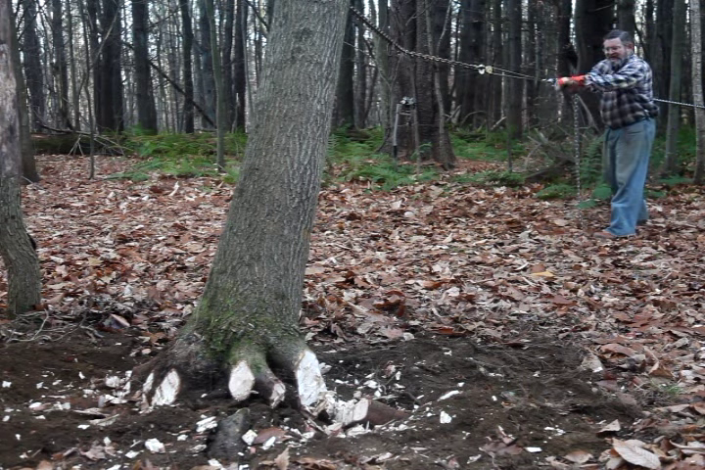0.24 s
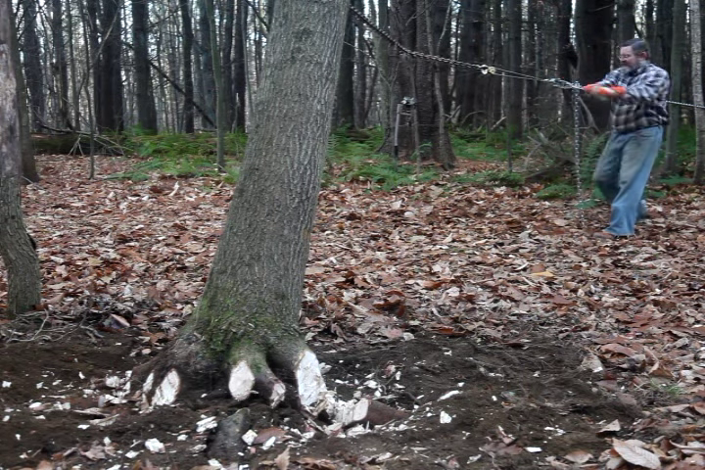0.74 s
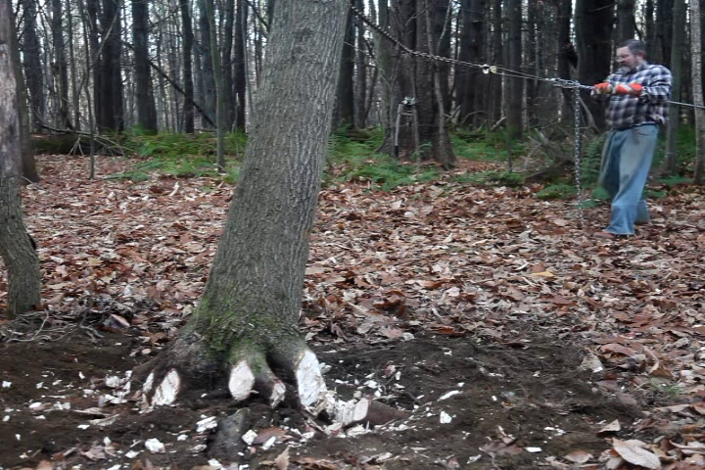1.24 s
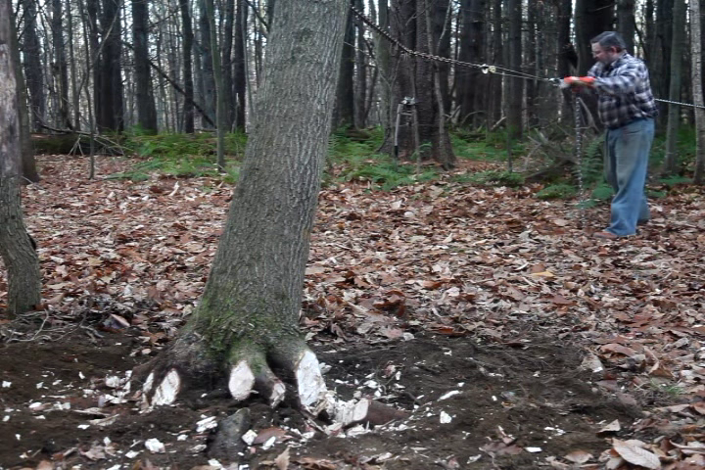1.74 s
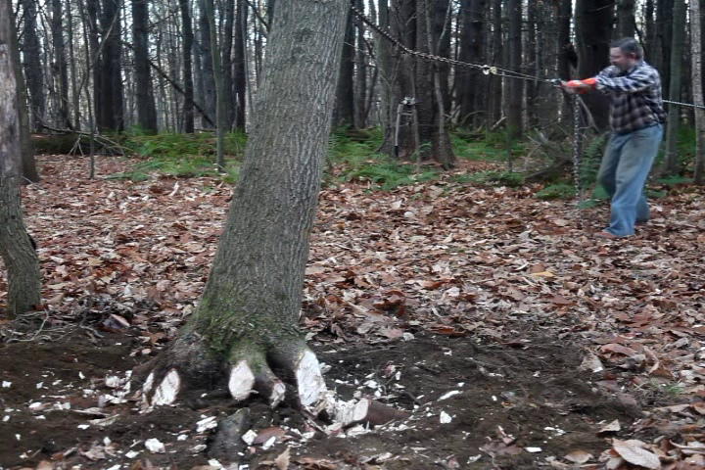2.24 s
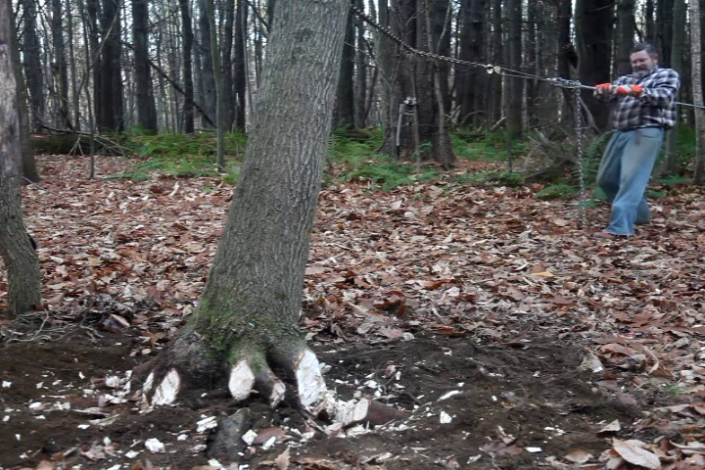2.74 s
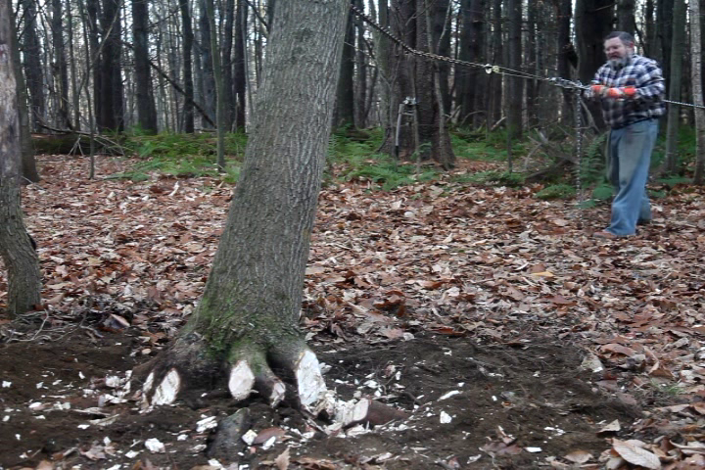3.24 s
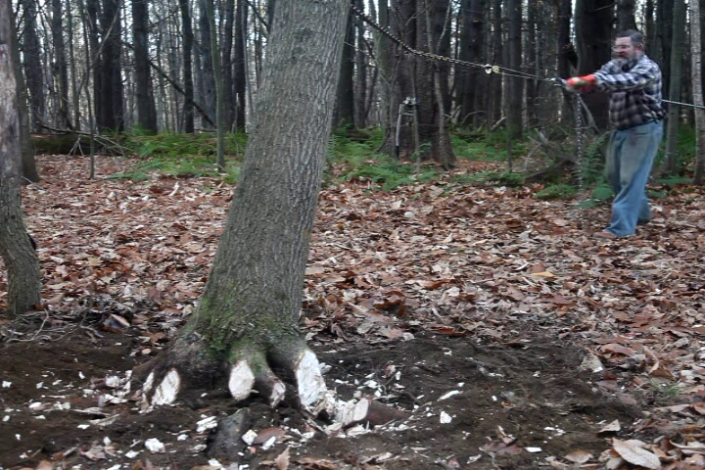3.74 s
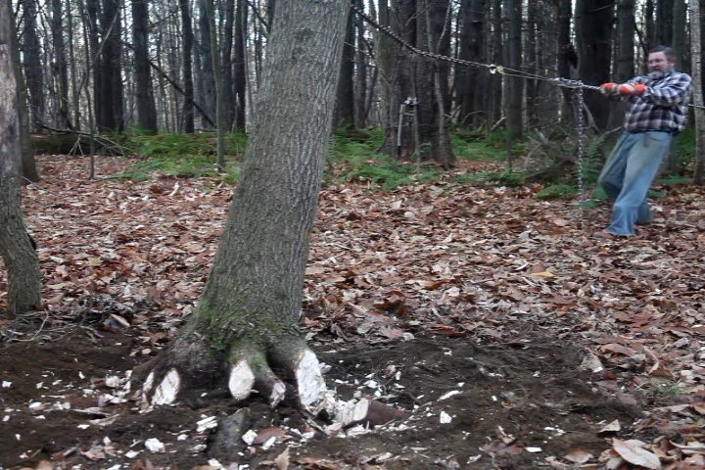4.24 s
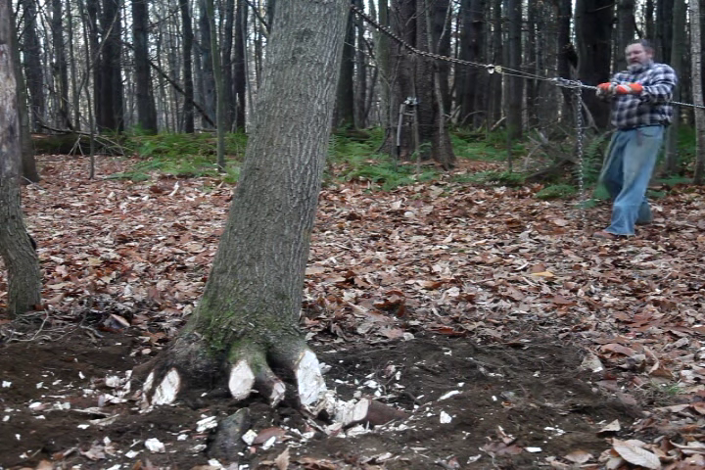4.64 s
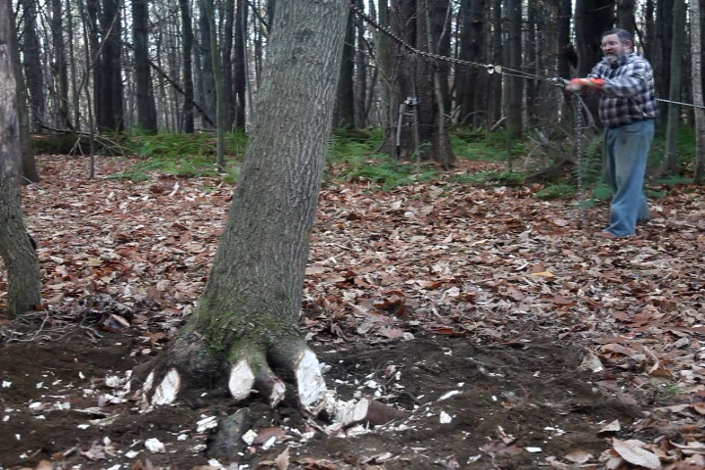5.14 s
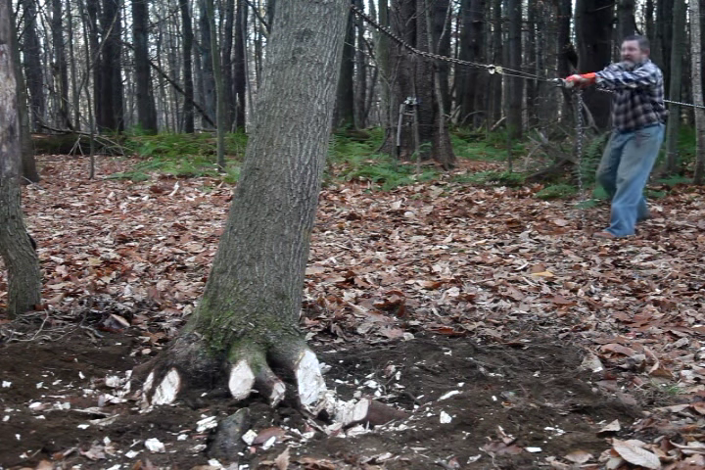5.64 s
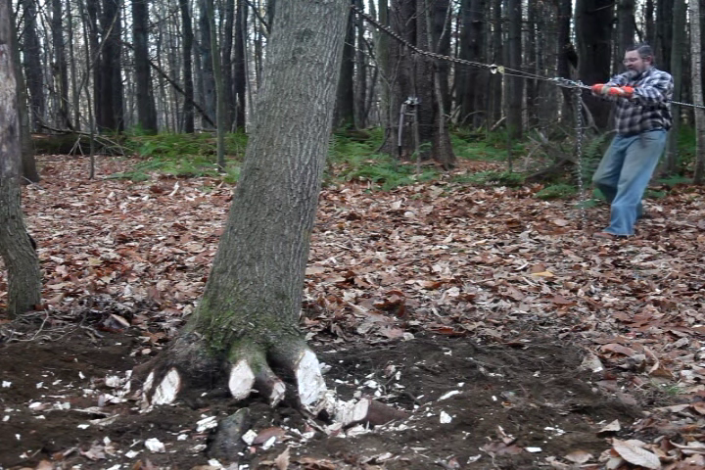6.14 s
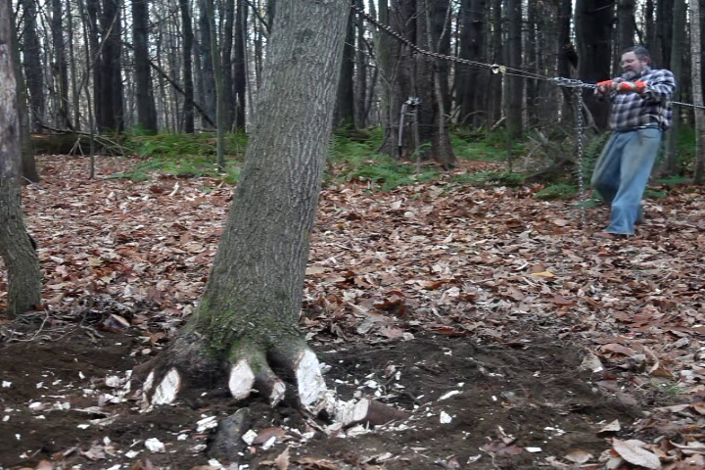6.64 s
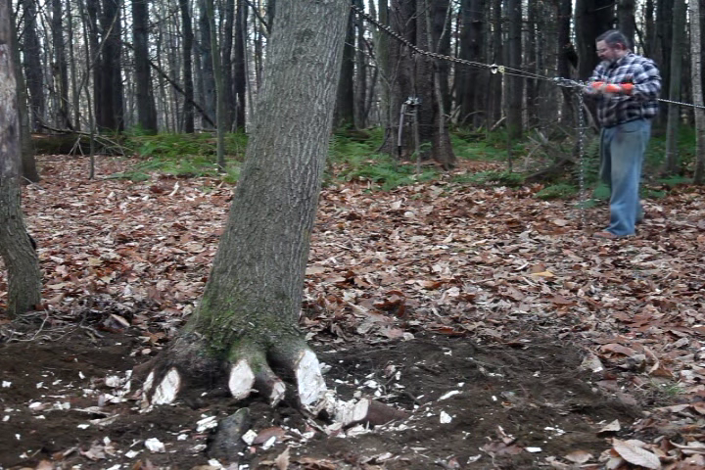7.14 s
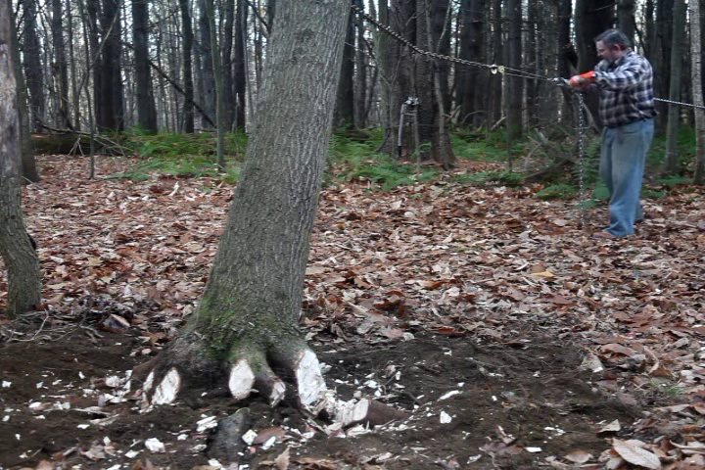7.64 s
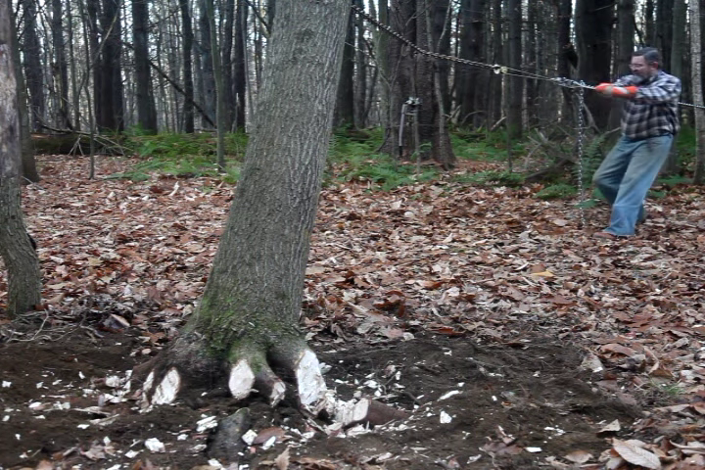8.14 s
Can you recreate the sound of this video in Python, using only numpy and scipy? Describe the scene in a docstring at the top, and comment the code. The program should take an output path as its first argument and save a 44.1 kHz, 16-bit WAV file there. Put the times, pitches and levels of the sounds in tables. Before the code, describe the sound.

In an open leafy wood, a hand-levered winch gives bright, hard ratchet clacks in small groups, with softer return clicks and faint chain jingles between. Around six seconds the chain slips in a rapid grinding clatter, knocking dully in the nearby trunk, alongside the loudest clacks. Leaves rustle and crunch underfoot, then clicks resume. The microphone sits near the trunk, winch some metres away, with soft woodland echo and distant traffic and wind.

```python
"""Sharp ratchet clacks, grinding chain slips and dry leaves rustling underfoot, in a leafy wood.
A hand winch tightens a chain to a tree: two pawls drop in turn over the ratchet teeth, as noise cracks and ringing metal.
The chain slips link by link and jingles; each jolt knocks in the nearby trunk just before it arrives through the air.
Snaps are short pitched noise, rustle is dense crackle, close taps are filtered clicks, and the wood adds a noise tail.
Behind it all lie far traffic and wind, as shaped noise, and a faint engine drone of wandering tones."""
import sys
import numpy as np
from scipy import signal
from scipy.fft import rfft, irfft, next_fast_len
from scipy.io import wavfile
from scipy.ndimage import uniform_filter1d

SR = 44100
rng = np.random.default_rng(int(sys.argv[2]) if len(sys.argv) > 2 else 0)


def transcribe(u):
    """Save the signal u as a 16-bit wav file named by the first command-line argument.

    u: samples, shape (n,) or (channels, n), limited to [-1, 1]; the rate is SR.
    q: integer samples, one column per channel.
    """
    v = np.clip(np.atleast_2d(u).T, -1, 1)
    q = np.round(v * 32767).astype(np.int16)
    wavfile.write(sys.argv[1], SR, q)


def magnitude_from_level(level_db):
    """Linear magnitude for a level in decibels (20 dB per decade)."""
    exponent = np.asarray(level_db, float) / 20
    return 10 ** exponent


N = 370440  # length in samples

# The holding pawl drops while the lever is pulled. Each row: start in seconds, level in dB.
HOLD_PAWL_DROPS = [(0.769, -6.5), (0.8894, -4.5), (0.9941, -4), (2.47, -7), (2.5813, -9), (2.7045, -6.5),
                   (4.1699, -5), (4.289, -2.5), (6.0061, 0), (6.2327, 2), (6.454, -0.5), (8.2529, -1.5),
                   (8.3583, -2.5)]
# The lever's own pawl drops while the lever swings back. Each row: start in seconds, level in dB.
LEVER_PAWL_DROPS = [(0.031, -15), (0.2505, -16), (1.629, -14.5), (1.748, -10.5), (1.8981, -19.5),
                    (3.4027, -15.5), (3.5215, -12.5), (3.9502, -30), (5.091, -12), (5.1997, -7),
                    (5.362, -7), (7.2576, -9.5), (7.3784, -9)]
# Chain links slip under load. Each row: start in seconds, level in dB.
CHAIN_SLIPS = [(5.9283, -18.5), (5.9559, -11), (5.998, -7), (6.0586, -8.5), (6.1101, -4), (6.1596, -2.5),
               (6.198, -1.5), (6.235, -16.5), (6.2698, -1), (6.3067, 1), (6.355, -3), (6.3841, -2),
               (6.4186, 1), (6.458, -0.5), (6.5, -8), (6.5485, -3), (8.223, -18)]
# Slack links touch. Each row: start in seconds, level in dB.
LINK_TOUCHES = [(0.002, -27.5), (0.081, -24), (0.628, -45), (0.7, -38), (1.463, -33), (1.52, -25.5),
                (1.547, -31), (1.586, -27), (1.666, -22), (1.74, -24), (1.812, -24), (3.196, -30),
                (3.26, -36), (4.011, -30.5), (4.044, -24), (4.084, -39), (4.109, -25.5)]
# Tugs set the loose handle chattering. Each row: start in seconds, level in dB.
HANDLE_TUGS = [(5.54, -27), (5.572, -27), (5.749, -21), (7.499, -26), (7.964, -24), (7.982, -24),
               (8.083, -28.5), (8.104, -32)]
# The trunk takes up load with a dull crunch. Each row: start in seconds, level in dB.
TRUNK_HEAVES = [(0.759, -35), (2.333, -33), (2.438, -29.5), (4.145, -23.5), (8.2124, -15.5)]
# Feet shift in the leaves. Each row: start in seconds, start of the fade in seconds, level in dB.
FOOT_RUSTLES = [(0.438, 0.775, -58), (1.344, 1.943, -44), (2.15, 2.48, -52), (3.114, 3.434, -46),
                (3.608, 4.205, -46), (4.545, 4.95, -45.5), (6.585, 6.806, -31.5), (6.891, 7.166, -35),
                (7.423, 7.559, -32.5), (7.96, 8.22, -46.5)]
# Twigs and leaves snap underfoot. Each row: start in seconds, level in dB, pitch in Hz.
TWIG_SNAPS = [(1.3789, -15.5, 5600), (1.394, -18, 6600), (2.064, -22, 6400), (4.575, -9, 7150),
              (5.753, -19.5, 6360), (6.832, -18.5, 7800), (6.978, -0.5, 5600), (7.075, -6, 7100),
              (7.941, -22.5, 6200), (8.003, -16.5, 6500), (8.105, -20.5, 6400), (8.1462, -15.5, 6500),
              (8.164, -21.5, 5660)]
# Short knocks close to the microphone. Each row: start in seconds, level in dB, pitch in Hz, brightness in Hz.
CLOSE_TAPS = [(0.941, -10, 358, 1920), (1.129, -29.5, 182, 497), (1.145, -27, 124, 293),
              (2.528, -15.5, 365, 1950), (2.798, -29.5, 335, 1000), (4.248, -13, 336, 1520),
              (7.2177, 1.5, 1130, 6200), (8.369, -11.5, 180, 1190)]

# Ringing of the winch frame. Each row: frequency in Hz, level in dB, time to fall 60 dB in seconds.
FRAME_MODES = [(2240, -25, .16), (3960, -28, .15), (4510, -25, .2), (5000, -22, .06), (6870, -18, .14),
               (7230, -9, .03), (8810, -17, .05), (9600, -20, .03)]
# Ringing of the lever. Each row: frequency in Hz, level in dB, time to fall 60 dB in seconds.
LEVER_MODES = [(2250, -26, .12), (2600, -24, .06), (3280, -20, .04), (5390, -25, .1), (6810, -20, .07),
               (7210, -19, .13), (7450, -9, .02), (8050, -21, .05)]
# Ringing of a loaded link. Each row: frequency in Hz, level in dB, time to fall 60 dB in seconds.
LINK_MODES = [(2710, -13, .025), (4000, -9, .025), (4280, -10, .025), (6310, -4, .03), (7480, -8, .025),
              (8250, -8, .035)]
# Ringing of a slack link. Each row: frequency in Hz, level in dB, time to fall 60 dB in seconds.
LOOSE_LINK_MODES = [(4820, -13, .05), (5090, -3, .05), (5740, -10, .08), (7670, -11, .13), (8180, -14, .02)]
# Ringing of the handle. Each row: frequency in Hz, level in dB, time to fall 60 dB in seconds.
HANDLE_MODES = [(2050, -5, .025), (2550, -3, .028), (3450, -5, .015), (4380, -6, .015)]
# Ringing of the trunk. Each row: frequency in Hz, level in dB, time to fall 60 dB in seconds.
TRUNK_MODES = [(199, -27, .12), (365, -22, .07), (402, -18, .08), (438, -22, .07), (662, -31, .1),
               (1370, -17, .04), (1475, -16, .04), (1900, -12, .04), (2100, -19, .07), (2440, -19, .06),
               (2710, -18, .03)]

# Colour of metal cracks. Each row: frequency in Hz, relative level in dB.
CRACK_SPECTRUM = [(400, -19), (1400, -11), (2400, -3), (3500, -5), (5100, 4), (6000, 3.5), (7300, 9.5),
                  (9000, -0.5), (10500, -10.5), (16000, -20.5)]
# Colour of leaf crackle. Each row: frequency in Hz, relative level in dB.
LEAF_SPECTRUM = [(900, -21.5), (2200, -2), (4000, -3), (6600, 3), (9000, -7), (16000, -40)]
# Colour of the far traffic and wind. Each row: frequency in Hz, relative level in dB.
AIR_SPECTRUM = [(15, -31), (25, -8.5), (91, 5.5), (242, 0.5), (658, 0), (1220, -5.5), (2280, -9.5),
                (6910, -12.5), (16000, -32.5)]
# Swell of the far traffic and wind. Each row: time in seconds, gain in dB.
AIR_GAIN = [(0, -0.5), (1.0, -5), (1.8, 2), (2.6, -7), (3.6, -1.5), (4.6, -0.5), (5.6, 1), (6.8, 6),
            (8.4, -2)]
# Tones of the far engine. Each row: frequency in Hz, wander in Hz, level in dB.
DRONE_TONES = [(75.5, 2.56, -60.5), (124, 1.34, -60)]
# Swell of the engine drone. Each row: time in seconds, gain in dB.
DRONE_GAIN = [(0, -6), (2.3, 3), (4.2, 6.5), (4.6, -0.5), (8.4, -1)]


def band(x, low_hz, high_hz):
    """Band-pass: keeps what lies between two frequencies."""
    return signal.sosfilt(signal.butter(2, [low_hz, high_hz], "band", fs=SR, output="sos"), x)


def rms_one(x):
    """Scale to unit rms."""
    return x / np.sqrt(np.mean(x ** 2) + 1e-20)


def colour(x, spectrum):
    """Shape a signal by a spectrum, with unit gain for white noise."""
    size = next_fast_len(len(x))
    hz, db = np.transpose(spectrum)
    bin_hz = np.fft.rfftfreq(size, 1 / SR)
    gain = magnitude_from_level(np.interp(np.log(bin_hz + 1), np.log(hz), db))
    return irfft(rfft(x, size) * rms_one(gain), size)[:len(x)]


def drift(rate):
    """Slow chance: random knots, this many a second, joined by straight lines."""
    knots = rng.standard_normal(int(N / SR * rate) + 2)
    return np.interp(np.arange(N) / SR * rate, np.arange(len(knots)), knots)


def marks(s, db):
    """Single-sample clicks at the given times."""
    out = np.zeros(N)
    at = np.clip(np.round(np.asarray(s) * SR).astype(int), 0, N - 1)
    np.add.at(out, at, magnitude_from_level(db))
    return out + 1e-18  # keeps the filters from stalling on vanishing numbers


def burst(s, db, fall_s):
    """Noise that starts at once at each time and dies away exponentially."""
    envelope = signal.lfilter([1], [1, -np.exp(-1 / (fall_s * SR))], marks(s, db))
    return envelope * rng.standard_normal(N)


def ring(x, hz, t60):
    """A resonance: a unit click sets a sine of height 1 ringing, 60 dB down after t60 seconds."""
    radius, turn = magnitude_from_level(-60 / (t60 * SR)), 2 * np.pi * hz / SR
    return signal.lfilter([0, np.sin(turn)], [1, -2 * radius * np.cos(turn), radius * radius], x)


def strike(s, db, modes, contact_s, spread_db, rough=.5):
    """A contact, part clean hit and part scrape, drives each mode with new strength and from its own moment."""
    chance = np.clip(rng.standard_normal((len(s), len(modes))), -1.5, 1.5)
    lag = .002 * rng.random((len(s), len(modes)))
    scrape_gain = np.sqrt(rough / (contact_s * SR / 2))  # gives the scrape its share of a click's energy
    out = 0
    for k, (hz, level, t60) in enumerate(modes):
        at = s + lag[:, k]
        force_db = db + level + spread_db * chance[:, k]
        scrape = scrape_gain * burst(at, force_db, contact_s)
        hit = np.sqrt(1 - rough) * marks(at, force_db)
        out = out + band(ring(scrape + hit, hz, t60), hz / 1.3, hz * 1.3)
    return out


def pitched(rows, cycles, lengths):
    """One short noisy ring per event, at its own pitch."""
    size = 4000
    out, t = np.zeros(N + size), np.arange(size) / SR
    for (s, db, hz), fall_s in zip(rows, lengths):
        noise = rng.standard_normal(size) * np.exp(-t / fall_s)
        grain = ring(noise, hz, cycles / hz)
        out[round(s * SR):][:size] += magnitude_from_level(db) * grain / np.abs(grain).max()
    return out[:N]


def pawl(drops, modes, ring_db):
    """A sharp crack, a bounce a few ms later, a dull clack, and the metal ringing on while the chain rattles."""
    s, db = np.transpose(drops)
    bounce_s = s + rng.uniform(.0025, 0.0057, len(s))
    crack = marks(s, db + 11) + burst(s, db + 4.0, 0.0035) + burst(bounce_s, db - 1.5, 0.0042)
    rattle = burst(s, -18 + 0.78 * db, 0.035)  # follows 0.78 of the drop's level
    # the housing's clack grows less than the crack, so hard drops are brighter
    body = band(burst(s, -8 + 0.19 * db, 0.0099), 2030, 4070)
    metal = strike(s, db + ring_db, modes, contact_s=0.017, spread_db=4.0)
    return colour(crack + rattle, CRACK_SPECTRUM) + body + metal


def slips():
    """A link grinds over a tooth as coloured noise and clanks as struck modes."""
    s, db = np.transpose(CHAIN_SLIPS)
    grind = colour(burst(s, db - 8, 0.009), CRACK_SPECTRUM)
    return grind + strike(s, db + 2, LINK_MODES, contact_s=0.003, spread_db=1.5, rough=.25)


def trunk():
    """Jolts travel faster in steel than in air, so the trunk sounds first; drops stir only its upper modes."""
    lead_s = 0.0086
    slip_s, slip_db = np.transpose(CHAIN_SLIPS)
    slip_s = slip_s - lead_s
    slip_db = np.minimum(slip_db + 6.5, -7.5)  # jolts above the slip's level, up to a ceiling set by the load
    drop_s = np.transpose(HOLD_PAWL_DROPS + LEVER_PAWL_DROPS)[0] - lead_s
    # a drop jolts by the chain's tension, however loud the pawl: 2.17 dB more each second as it tightens
    drop_db = -34 + 2.17 * drop_s
    heave_s, heave_db = np.transpose(TRUNK_HEAVES)
    lower = [m for m in TRUNK_MODES if m[0] < 1000]
    upper = [m for m in TRUNK_MODES if m[0] > 1000]

    knock = burst(np.append(slip_s, drop_s), np.append(slip_db, drop_db) - 7, 0.013)
    knock = band(band(knock, 1100, 4800), 990, 4700)
    slip_top = strike(slip_s, slip_db + 9, upper, contact_s=.009, spread_db=1.0, rough=.15)
    slip_low = strike(slip_s, slip_db + 6.0, lower, contact_s=0.015, spread_db=1.0)
    shudder = strike(slip_s, slip_db - 6.5, lower, contact_s=0.14, spread_db=1.5, rough=0.96)
    heave_s_fall = 0.051
    heave = strike(heave_s, heave_db + 13, lower, contact_s=heave_s_fall, spread_db=4.5, rough=0.98)
    crunch = band(burst(heave_s, heave_db - 3, heave_s_fall), 300, 3500)
    drop_top = strike(drop_s, drop_db + 3, upper, contact_s=0.0065, spread_db=2.5)
    return knock + slip_top + slip_low + shudder + heave + crunch + drop_top


def jingle():
    """Each touch of the slack links ticks, scrapes and rings."""
    s, db = np.transpose(LINK_TOUCHES)
    touch = strike(s, db + 3, LOOSE_LINK_MODES, contact_s=.005, spread_db=2.0)
    return touch + colour(burst(s, db - 17, .004), CRACK_SPECTRUM)


def handle():
    """The loose handle chatters on its pivot: scraped modes over a short band of noise."""
    s, db = np.transpose(HANDLE_TUGS)
    chatter = strike(s, db, HANDLE_MODES, contact_s=.014, spread_db=3.0, rough=1)
    return chatter + band(burst(s, db - 4, .014), 2000, 6500)


def leaves():
    """Dense tiny crackles of chance size swell in clumps, and single snaps crunch as pitched noise."""
    t = np.arange(N) / SR
    swell = np.zeros(N)
    for start, fade, db in FOOT_RUSTLES:
        rise = np.clip((t - start) / 0.013, 0, 1)
        fall = magnitude_from_level(-20 * np.maximum(t - fade, 0) / 0.093)  # 20 dB down every 93 ms
        swell += magnitude_from_level(db) * rise * fall
    sizes = magnitude_from_level(2.9 * np.minimum(rng.exponential(1, N), 5)) * rng.standard_normal(N)
    crackles = sizes * (rng.random(N) < 3500 / SR)  # some 3500 a second
    rustle = rms_one(colour(crackles + 0.16 * rng.standard_normal(N), LEAF_SPECTRUM))
    clumps = magnitude_from_level(3.5 * drift(30))
    snaps = np.array(TWIG_SNAPS)
    snap_falls = 18.0 / snaps[:, 2]  # the driving noise decays over 18 cycles of the pitch
    return rustle * swell * clumps + band(pitched(snaps, cycles=15.0, lengths=snap_falls), 1700, 17000)


def taps():
    """A single click between the tap's pitch and its brightness, plus a dull ring."""
    out, pulse = np.zeros(N + 4000), np.eye(1, 4000)[0]
    for s, db, hz, bright_hz in CLOSE_TAPS:
        click = band(pulse, hz, bright_hz)
        click = click / np.abs(click).max()
        dull = band(ring(pulse, hz, 5.8 / hz), hz / 2, hz * 2)
        out[round(s * SR):][:len(pulse)] += magnitude_from_level(db) * (magnitude_from_level(-8.5) * dull - click)
    return out[:N]


def wood(x):
    """Countless trunks scatter the sound back: a dull noise tail that swells, then dies."""
    t60_s, gap_s, cut_hz, level_db = 0.59, 0.0026, 4200, -11
    t = np.arange(SR) / SR
    tail = rng.standard_normal(SR) * magnitude_from_level(-60 * t / t60_s) * (1 - np.exp(-(t / gap_s) ** 2))
    tail = signal.sosfilt(signal.butter(1, cut_hz, fs=SR, output="sos"), tail)
    return magnitude_from_level(level_db) * signal.fftconvolve(x, tail / np.sqrt(np.sum(tail ** 2)))[:N]


def air():
    """Far traffic and wind as shaped noise, with a faint engine drone of slightly wandering tones."""
    t = np.arange(N) / SR
    air_db = -42.5 + np.interp(t, *np.transpose(AIR_GAIN)) + 2.3 * drift(4.47)
    out = magnitude_from_level(air_db) * colour(rng.standard_normal(N), AIR_SPECTRUM)
    swell_db = np.interp(t, *np.transpose(DRONE_GAIN))
    for hz, wander_hz, db in DRONE_TONES:
        phase = 2 * np.pi * np.cumsum(hz + wander_hz * drift(6.)) / SR
        out += magnitude_from_level(db + swell_db + 0.5 * drift(3.5)) * np.sqrt(2) * np.sin(phase)
    return out


def scene(top_hz=12000):
    """Winch, chain and feet lose their top over the distance and echo in the wood; air and taps do not."""
    winch = pawl(HOLD_PAWL_DROPS, FRAME_MODES, ring_db=1.5) + pawl(LEVER_PAWL_DROPS, LEVER_MODES, ring_db=3.0)
    far = winch + slips() + trunk() + leaves() + jingle() + handle()
    far = signal.sosfilt(signal.butter(2, top_hz, fs=SR, output="sos"), far)
    return (far + wood(far) + air() + taps())[None]


def band_limit(x):
    """A steep low-pass at the top of the band."""
    return signal.sosfilt(signal.butter(12, 16110, fs=SR, output="sos"), x)


def record(dry, knee_db=-24, share=0.61, release_db_s=10):
    """Gain control ducks just after loud peaks and creeps back; the very top clips."""
    t = np.arange(N) / SR
    level_db = 10 * np.log10(np.abs(uniform_filter1d(dry[0] ** 2, size=220)) + 1e-12)
    cut_db = share * np.maximum(level_db - knee_db, 0)
    # hold the deepest cut so far, let go at a steady rate in dB per second
    held_db = np.maximum(np.maximum.accumulate(cut_db + release_db_s * t) - release_db_s * t, 0)
    lag = np.exp(-1 / (.006 * SR))  # the gain follows with a 6 ms lag
    ducked = dry * magnitude_from_level(-signal.lfilter([1 - lag], [1, -lag], held_db))
    return band_limit(np.clip(ducked, -1, 1))


dry = scene()
out = record(dry)
transcribe(out)
```